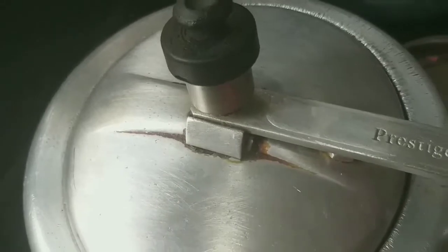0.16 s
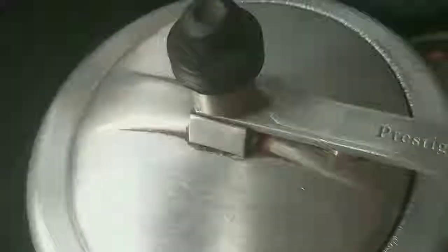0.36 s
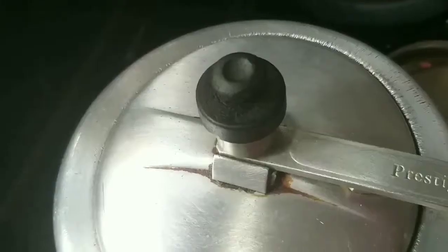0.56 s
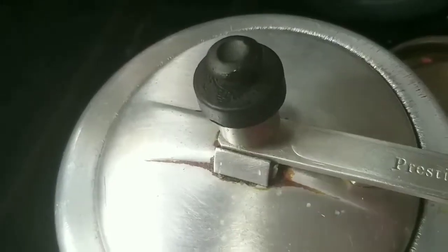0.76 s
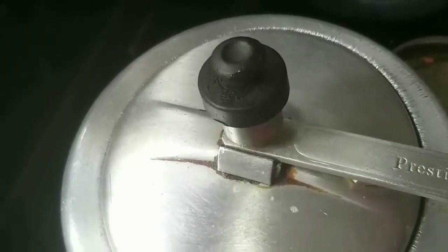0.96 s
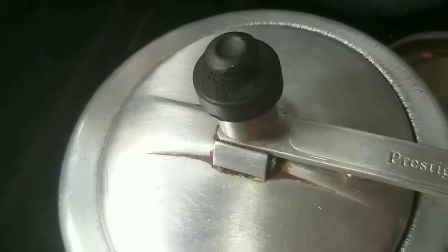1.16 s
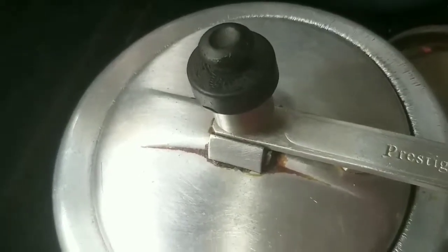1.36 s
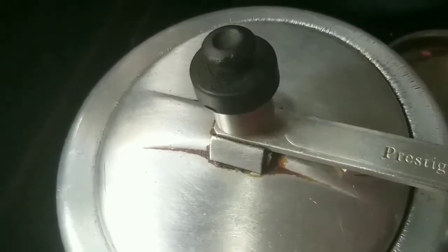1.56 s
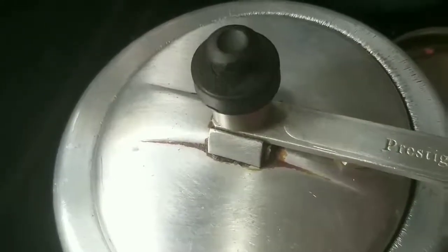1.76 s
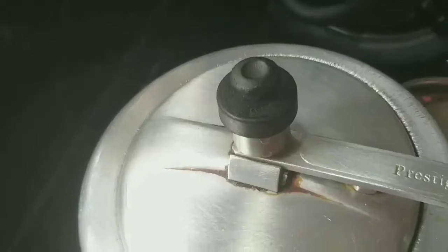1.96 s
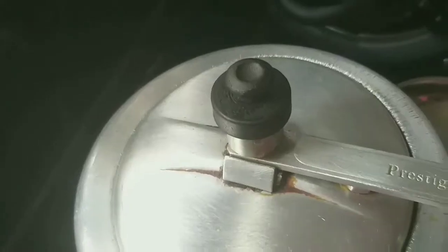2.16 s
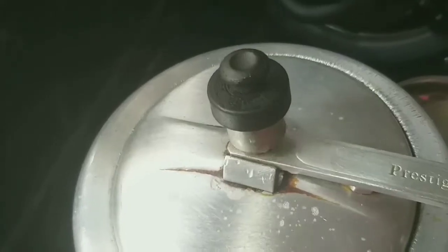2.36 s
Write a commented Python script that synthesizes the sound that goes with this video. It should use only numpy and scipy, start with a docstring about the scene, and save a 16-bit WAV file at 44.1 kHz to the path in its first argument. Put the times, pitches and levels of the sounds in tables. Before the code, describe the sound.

Steam jets loudly from a pressure cooker with a fast throb. It stops abruptly, leaving a thin sputtering hiss, blasts again for longer, nearly whistling, then drops and returns once more. Heard close up in a small kitchen.

```python
"""A jet of steam roars from under the lifted weight of a pressure cooker, close by in a small kitchen.
The jet throbs as the weight wobbles on the vent, and at times nearly whistles at the vent's resonance.
Twice the weight drops and cuts it off; steam then squeezes through the seat as a thin, sputtering hiss
until it lifts again. Nearby metal adds early echoes, the walls a short tail."""
import sys
import numpy as np
from scipy import signal
from scipy.fft import rfft, irfft
from scipy.io import wavfile
from scipy.ndimage import uniform_filter1d

SR = 44100
rng = np.random.default_rng(int(sys.argv[2]) if len(sys.argv) > 2 else 0)


def generate_wav(signal):
    """Clip the signal to [-1, 1] and save it as 16-bit WAV at the path in sys.argv[1]."""
    frames = np.transpose(np.atleast_2d(signal))
    scaled = np.clip(frames, -1, 1) * 32767
    pcm = np.round(scaled).astype(np.int16)
    wavfile.write(sys.argv[1], SR, pcm)


N = 105663
ROUGH_HZ = 499.5  # fast level flicker of jet and leak


def undb(db):
    """Decibels to gain."""
    return 10 ** (np.asarray(db) / 20)


def walk(rate_hz):
    """Smooth random wander of unit spread."""
    hold = max(int(SR / rate_hz), 1)
    steps = np.repeat(rng.standard_normal(N)[:N // hold + 1], hold)
    smooth = uniform_filter1d(uniform_filter1d(steps, hold), hold)[:N]
    return smooth / smooth.std()


def contour(points, f):
    """Gain of (freq_hz, level_db) points joined on a log-frequency axis."""
    hz, db = np.array(points, float).T
    return undb(np.interp(np.log(f), np.log(hz), db))


def turbulence(spectrum, peaks, side_spectrum, high_hz, low_hz=10):
    """Band-limited stereo flow noise coloured by resonances; mid at unit RMS."""
    f = np.maximum(np.fft.rfftfreq(N, 1 / SR), 1)
    gain = contour(spectrum, f) / np.hypot(1, (f / high_hz) ** 60) / np.hypot(1, (low_hz / f) ** 7)
    for centre_hz, width_hz, gain_db in peaks:
        gain *= undb(gain_db / (1 + (2 * (f - centre_hz) / width_hz) ** 2))
    mid = irfft(rfft(rng.standard_normal(N)) * gain, N)
    side = irfft(rfft(rng.standard_normal(N)) * gain * contour(side_spectrum, f), N)
    return np.array([mid + side, mid - side]) / mid.std()


def valve(t, start_s, end_s, level_db, swell_db_per_s, rise_db_per_s, fall_db_per_s):
    """Gain of a flow that is fully open at start_s and begins to shut at end_s."""
    open_db = level_db + swell_db_per_s * (np.clip(t, start_s, end_s) - start_s)
    shut_db = rise_db_per_s * np.maximum(start_s - t, 0) + fall_db_per_s * np.maximum(t - end_s, 0)
    return undb(open_db - shut_db)


def bump(t, centre_s, level_db, half_width_s):
    """Gain of a short Gaussian swell."""
    return undb(level_db) * np.exp(-((t - centre_s) / half_width_s) ** 2)


def kitchen(x, level_db=-22.5, t60_s=0.16, delay_s=0.0016):
    """The walls return a short, diffuse tail."""
    t = np.arange(SR // 2) / SR
    tail = rng.standard_normal((2, len(t))) * np.exp(-np.log(1000) * t / t60_s) * (t > delay_s)
    tail /= np.linalg.norm(tail, axis=1, keepdims=True)
    return x + undb(level_db) * signal.fftconvolve(x, tail, axes=1)[:, :N]


def metal_echoes(x, level_db=-13, decay_s=0.0067, delay_s=0.001):
    """Early reflections off lid, handle and hob ripple the spectrum."""
    t = np.arange(SR // 20) / SR
    echoes = rng.standard_normal(len(t)) * np.exp(-t / decay_s) * (t > delay_s)
    echoes /= np.linalg.norm(echoes)
    return x + undb(level_db) * signal.fftconvolve(x, echoes[None], axes=1)[:, :N]


def faint_tone(t, pitch_hz=1170):
    """A brief, soft tone under the second leak."""
    return bump(t, centre_s=2.101, level_db=-50.5, half_width_s=0.0073) * np.sin(2 * np.pi * pitch_hz * t)


# near-whistles: centre_s, level_db, half_width_s
WHISTLE_SWELLS = [(0.75, -25.5, 0.055), (1.62, -31, .1)]

def whistle(t, pitch_hz=5630, half_width_hz=140):
    """A narrow, airy band swells out of the jet at the vent's resonance."""
    f = np.fft.rfftfreq(N, 1 / SR)
    resonance = 1 / (1 + ((f - pitch_hz) / half_width_hz) ** 2)
    band = irfft(rfft(rng.standard_normal(N)) * resonance, N)
    return band / band.std() * sum(bump(t, *row) for row in WHISTLE_SWELLS)


# rocking of the weight: time_s, rate_hz, throb_db
WEIGHT_WOBBLE = [(0, 40.9, 0.5), (.2, 46.3, 2.1), (.3, 43, 0), (.6, 41.6, 7.7), (.76, 42.43, -1.2),
                 (.88, 43.9, 2.5), (1.2, 41.1, 1.1), (1.4, 45.15, 2), (1.52, 42.1, 1.6), (1.69, 44.44, 2),
                 (1.9, 44.06, 8.2), (2.4, 45.2, -0.8)]

def wobble(t):
    """The weight rocks unevenly on the vent; returns its motion and the jet's throb depth."""
    time_s, rate_hz, throb_db = np.array(WEIGHT_WOBBLE).T
    drifting_hz = np.interp(t, time_s, rate_hz) * (1 + 0.021 * walk(rate_hz=14))
    turns = np.cumsum(drifting_hz) / SR
    reach = 1 + 0.17 * walk(rate_hz=5.5)
    return -np.cos(2 * np.pi * turns) * reach, np.interp(t, time_s, throb_db)


# thin hiss: freq_hz, level_db
HISS_SPECTRUM = [(1000, -56.5), (2000, -29.5), (2700, -21.5), (3800, -16.5), (5100, -11.5), (5900, 1),
                 (6600, -1), (7200, -3.5), (8300, -4.5), (9400, -6.5), (10300, -15), (11500, -27)]
# vent and hollow-weight resonances: centre_hz, width_hz, gain_db
HISS_RESONANCES = [(5490, 110, 3), (6320, 130, 1.2), (8200, 790, 0.99)]
# stereo width: freq_hz, side_minus_mid_db
HISS_WIDTH = [(2000, -2), (3600, -8), (6400, -18.5), (10000, -8.5)]
# rush below the hiss: freq_hz, level_db
RUSH_SPECTRUM = [(100, -37), (400, -24), (900, -12), (1600, 6.5), (4000, 2.5), (9000, -15.5)]
# surges as the weight shifts: centre_s, level_db, half_width_s
HISS_SURGES = [(0.325, -30.5, 0.025), (0.544, -26, 0.013), (.568, -24.5, .006), (0.607, -22.5, .006),
               (1.802, -34.5, 0.006), (2.011, -23.5, .012), (2.078, -22, 0.0087), (2.119, -27, 0.013),
               (2.165, -23.5, .005), (2.254, -23, 0.0075), (2.305, -27, 0.0063), (2.34, -19, 0.036)]
# leaks: start_s, end_s, level_db, swell_db_per_s, relative_rush_db, low_hz, high_hz, sizzle_db
SEAT_LEAKS = [(0.438, .645, -34, 51.5, -22.5, 1230, 10400, 7),
              (1.885, 2.28, -25.5, 0.5, -65, 2130, 11800, -1.5)]

def leak(t, rock, seep_db=-62.5, seep_rush_db=-25, throb_db=0.5, sizzle_hz=8930, sizzle_width_hz=1800):
    """Steam hisses through the seat's narrow gap over a faint rush; a trace always seeps out."""
    rush = turbulence(RUSH_SPECTRUM, [], JET_WIDTH, high_hz=8000)
    hiss = turbulence(HISS_SPECTRUM, HISS_RESONANCES, HISS_WIDTH, high_hz=10700, low_hz=1500)
    surges = sum(bump(t, *row) for row in HISS_SURGES)
    out = hiss * (surges + undb(seep_db)) + rush * undb(seep_db + seep_rush_db)
    for *opening, rush_db, low_hz, high_hz, sizzle_db in SEAT_LEAKS:
        peaks = HISS_RESONANCES + [(sizzle_hz, sizzle_width_hz, sizzle_db)]
        hiss = turbulence(HISS_SPECTRUM, peaks, HISS_WIDTH, high_hz, low_hz)
        flow = valve(t, *opening, rise_db_per_s=2300, fall_db_per_s=194.5)
        out += flow * (hiss + undb(rush_db) * rush)
    waver_db = 2 * walk(rate_hz=40)
    rough_db = 0.95 * walk(ROUGH_HZ)
    return out * undb(throb_db * rock + waver_db + rough_db)


# broad roar: freq_hz, level_db
JET_SPECTRUM = [(25, -26), (55, -12.5), (90, -5), (165, -5), (370, -1.1), (1240, -3), (3320, -3),
                (4960, -2.5), (5630, -2), (6880, -1.5), (8200, -3.5), (9300, -10.5), (10300, -14),
                (11000, -34.5)]
# vent and hollow-weight resonances: centre_hz, width_hz, gain_db
JET_RESONANCES = [(1876, 200, 3.1), (5610, 220, 3), (6250, 400, 0), (7030, 260, -6.5), (7300, 260, 2.5),
                  (8300, 339, 0.6), (9400, 210, 3)]
# stereo width, shared with the leak's rush: freq_hz, side_minus_mid_db
JET_WIDTH = [(60, -8.5), (350, -13.5), (1100, -12.5), (2000, -9), (3600, -9), (6400, -11), (10000, -4.5)]
# weight lifted: start_s, end_s, level_db, swell_db_per_s, high_hz
JET_BLASTS = [(-.1, 0.317, -16, -0.5, 10770), (0.674, 1.778, -17.5, 0.52, 10060),
              (2.35, 2.5, -15.5, 2, 10400)]

def jet(t, rock, throb_db):
    """Steam blasts out under the lifted weight, throbbing with its wobble."""
    out = 0
    for *opening, high_hz in JET_BLASTS:
        roar = turbulence(JET_SPECTRUM, JET_RESONANCES, JET_WIDTH, high_hz)
        out += roar * valve(t, *opening, rise_db_per_s=727.5, fall_db_per_s=1350.5)
    rough_db = 0.26 * walk(ROUGH_HZ)
    return out * undb(throb_db * rock + rough_db)


def scene():
    """The cooker in its kitchen; jet and leak share one wobble."""
    t = np.arange(N) / SR
    rock, throb_db = wobble(t)
    cooker = jet(t, rock, throb_db) + leak(t, rock) + whistle(t) + faint_tone(t)
    return kitchen(metal_echoes(cooker))


def record(dry):
    """A steep low-pass cuts the top treble."""
    cutoff_hz = 11800
    return signal.sosfilt(signal.ellip(10, .2, 90, cutoff_hz, fs=SR, output="sos"), dry)


dry = scene()
out = record(dry)
generate_wav(out)
```